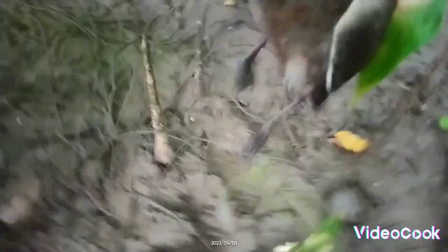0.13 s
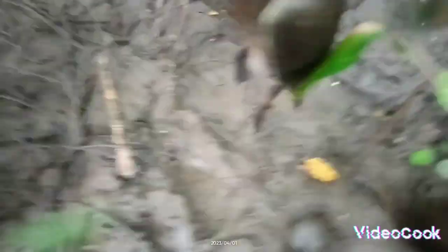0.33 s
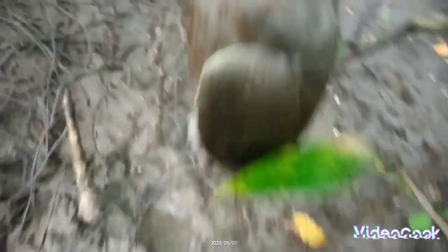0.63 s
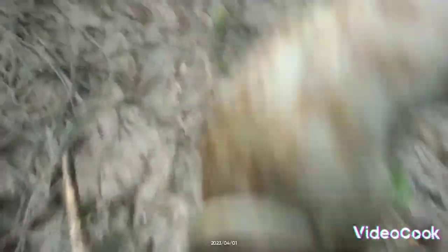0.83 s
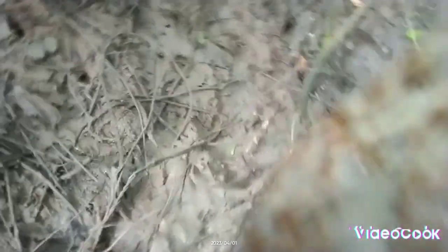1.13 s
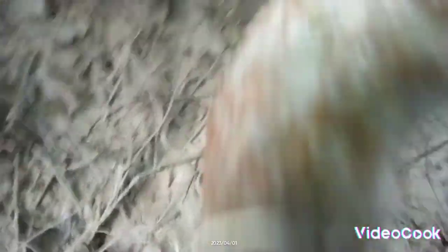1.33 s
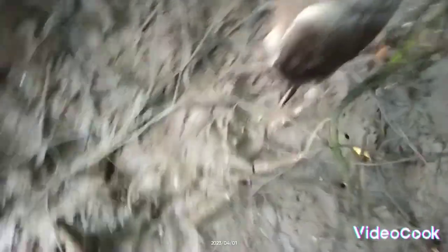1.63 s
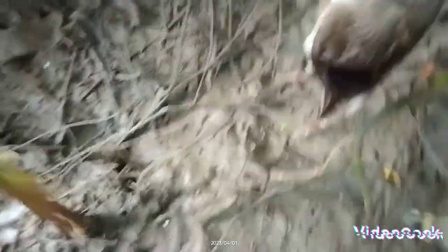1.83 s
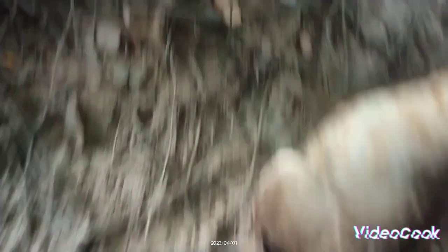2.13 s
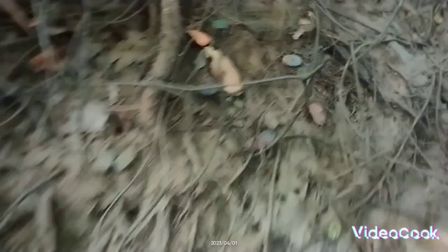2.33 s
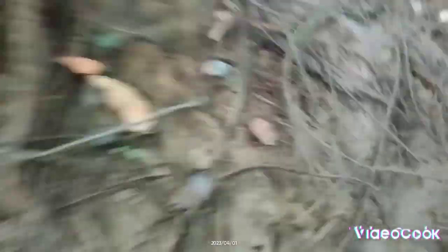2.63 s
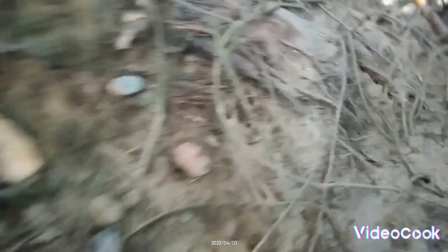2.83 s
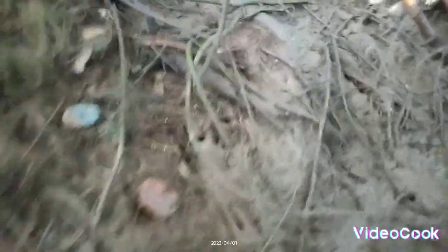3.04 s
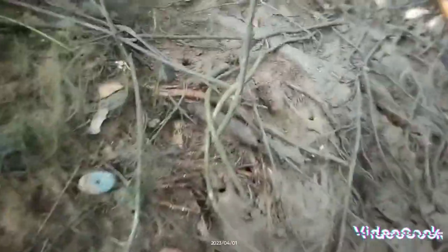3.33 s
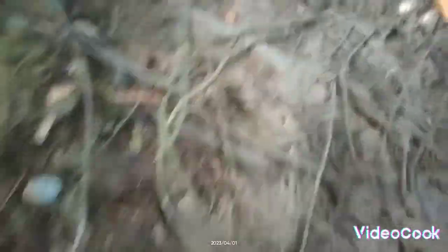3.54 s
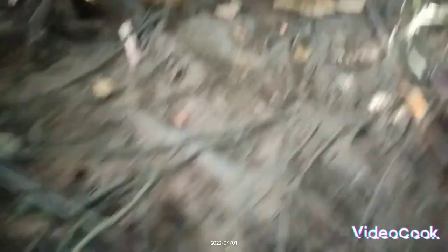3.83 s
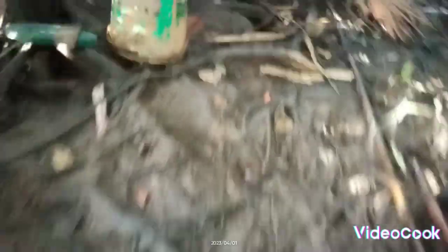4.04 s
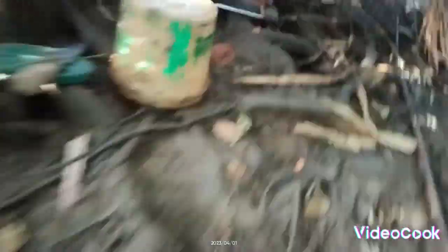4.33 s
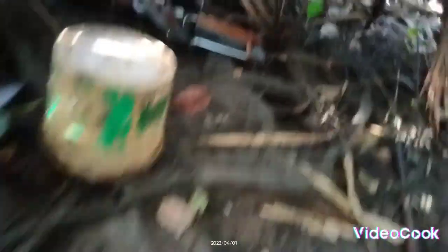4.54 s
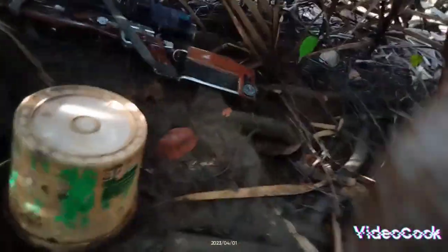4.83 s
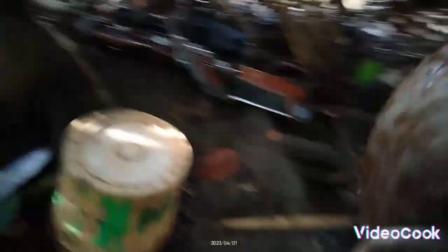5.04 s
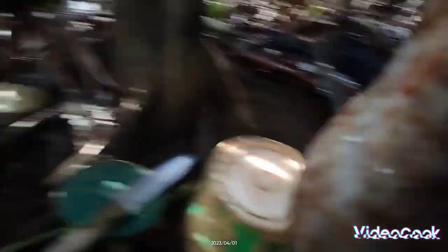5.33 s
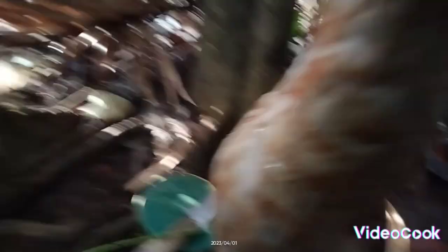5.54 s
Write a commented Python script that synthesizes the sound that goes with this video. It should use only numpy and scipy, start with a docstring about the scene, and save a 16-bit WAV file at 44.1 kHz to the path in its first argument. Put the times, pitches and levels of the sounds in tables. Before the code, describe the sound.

A person walks through dry leaves, twigs and roots in woodland, heard very close and dry in mono, with only faint scatter from ground and trunks. Leaf rustle runs throughout, full of tiny ticks and swelling with each leg movement. A loud woody snap comes at about 0.2 seconds, then a heavier step at 0.6 to 0.8 with low thuds, cracking twigs and brief scrapes. Rustling swells around 1.4, and another weighty step lands at 1.7 to 1.8 with dull soil knocks. At about 2.36 a bright, crisp crunch bursts out. From 2.5 to 4 the movement is lighter: scattered snaps, small crackles and a short brush near 3.6. A strong cluster of snaps and crunching breaks at 4.3, with a thud. Afterwards it thins quickly, with a small crackly step around 5.0 and faint ticks, sinking by 5.6 into a barely audible forest hush.

```python
"""A littered forest floor: someone walks over it, close to a hand-held microphone, then slows to a stop.
Dry leaves rustle all along: showers of tiny clicks and noise, louder with each sweep of a foot or leg.
Feet thud on the soil (fading low tones and noise), scrape over stems (slips ringing one narrow pitch),
crush the litter (dense volleys of clicks) and snap twigs (a ringing tone with a crack of noise).
Over a faint steady hush, the steps scatter softly off the ground and trunks. The sound is mono."""
import sys
import numpy as np
from scipy import signal
from scipy.io import wavfile
from scipy.ndimage import uniform_filter1d

SR = 44100
rng = np.random.default_rng(int(sys.argv[2]) if len(sys.argv) > 2 else 0)


def store_pcm(level_fs):
    """Save levels as 16-bit WAV."""
    pcm = np.round(np.clip(level_fs, -1, 1) * 32767).astype(np.int16)
    wavfile.write(sys.argv[1], SR, np.atleast_2d(pcm).T)


N = 251392  # length of the scene in samples

# Levels in these tables are relative: each layer is trimmed again where it is mixed.
# colour of the forest's hush: pitch_hz, level_db (per Hz)
AIR_COLOUR = [(20, -7.5), (60, 5), (130, 10), (220, 10), (500, -21), (2000, -26), (8000, -29.5),
              (16000, -30)]
# how much the litter stirs between strides, dying away as the walk stops:
# time_s, leaf_rustle_db, low_brushing_db, crisp_top_db
STIR_LEVELS = [(0.0, -38.5, -50, -46), (0.79, -41, -50.5, -44.5), (1.13, -42, -55.5, -48),
               (1.41, -35.5, -56, -39), (1.79, -41, -45.5, -57), (1.98, -38, -49.5, -50.5),
               (2.19, -45.5, -54.5, -53), (2.62, -44.5, -52, -47), (2.87, -45, -57.5, -51),
               (3.35, -43, -54, -49.5), (3.67, -43, -59.5, -46.5), (3.98, -47.5, -56.5, -57),
               (4.19, -51, -56.5, -58.5), (4.44, -46.5, -58.5, -48), (4.78, -60.5, -70, -69),
               (5.19, -56, -61.5, -53), (5.52, -68, -79.5, -73.5), (5.7, -71.5, -78.5, -69.5)]
# a foot or leg sweeps through the litter:
# peak_s, length_s, leaf_rustle_db, low_brushing_db, crisp_top_db
LEG_SWEEPS = [(0.103, 0.11, -43, -58, -45), (0.207, 0.084, -48, -37, -46), (0.344, 0.22, -40, -44, -42.5),
              (0.543, 0.062, -42, -36.5, -59), (0.639, 0.13, -30.5, -36.5, -40),
              (0.788, 0.15, -33.5, -42.5, -46.5), (0.97, 0.35, -45, -44, -64),
              (1.109, 0.076, -36, -40.5, -49), (1.375, 0.35, -38, -44, -56), (1.607, 0.11, -42, -44, -61),
              (1.775, 0.19, -34.5, -43, -38), (1.914, 0.13, -43, -43, -44), (2.076, 0.17, -41.5, -57, -42),
              (2.201, 0.07, -41.5, -49.5, -46), (2.364, 0.088, -40.5, -45, -47),
              (2.634, 0.42, -42, -69, -67), (3.078, .07, -42, -66, -45), (3.258, 0.1, -43.5, -70, -51),
              (3.574, 0.091, -38, -50, -40.5), (3.79, 0.21, -51, -74, -44.5), (4.217, .07, -41.5, -53, -63),
              (4.298, 0.14, -39, -44.5, -43.5), (4.56, 0.3, -50.5, -61, -49),
              (4.74, 0.069, -53.5, -70, -59), (5.006, 0.17, -44, -55, -48), (5.317, 0.048, -63, -72, -49.5),
              (5.437, 0.078, -53.5, -61.5, -54.5), (5.61, 0.061, -59, -66.5, -58.5)]
# colour of the sliding leaves: pitch_hz, level_db (per Hz)
LEAF_COLOUR = [(35, -41), (60, -8.5), (124, -8), (287, -11.5), (338, -6.5), (380, -9.5), (427, -8.5),
               (651, -9), (2140, 6.5), (2970, -0.5), (6900, -11), (7940, -9.5), (10800, -21), (13600, -17),
               (16000, -26.5)]
# weight landing on the soil: start_s, level_db, pitch_hz
SOIL_THUDS = [(0.117, -34, 487), (0.132, -29.5, 383), (0.2092, -32, 307), (0.538, -28, 900),
              (0.6, -21.5, 318), (0.631, -37, 140), (0.669, -30, 620), (0.698, -23.5, 660),
              (0.704, -26.5, 640), (0.708, -27.5, 163), (0.786, -30, 230), (0.793, -33.5, 149),
              (1.102, -33, 373), (1.383, -36, 342), (1.439, -30, 560), (1.618, -35.5, 135),
              (1.726, -26.5, 420), (1.737, -21.5, 356), (1.751, -26.5, 213), (1.799, -19, 470),
              (1.803, -25, 134), (1.82, -25.5, 242), (2.338, -33.5, 770), (4.318, -25, 486),
              (4.999, -35, 470)]
# a sole dragging over roots and stems: start_s, length_s, level_db, pitch_hz, width_hz
SOLE_SCRAPES = [(0.536, 0.024, -34.5, 1210, 600), (0.782, 0.03, -29, 3440, 347),
                (0.793, 0.02, -28.5, 2040, 400), (0.799, .017, -35, 935, 150),
                (0.802, 0.08, -43.5, 3650, 300), (0.928, .039, -39.5, 1620, 500),
                (1.33, 0.052, -40, 7960, 500), (3.568, 0.076, -43, 1290, 400),
                (4.182, 0.03, -46.5, 820, 450), (5.23, 0.1, -49.5, 5940, 800)]
# a clump of leaves crushed at once: start_s, level_db, decay_s, centre_hz
LEAF_CRUNCHES = [(0.334, -27.5, 0.014, 3040), (0.599, -29, 0.0058, 1300), (0.622, -29, 0.0037, 3500),
                 (0.698, -30, 0.01, 1390), (0.9098, -29, 0.0094, 1400), (1.759, -34, 0.0057, 4000),
                 (1.798, -26.5, 0.0037, 3000), (2.3566, -18, 0.0071, 4000), (2.3581, -15.5, 0.005, 6500),
                 (2.365, -29.5, 0.032, 6000), (2.383, -24.5, 0.0046, 4000), (2.881, -35, 0.0066, 2800),
                 (3.082, -33, 0.016, 2370), (4.106, -40, .0022, 14000), (4.2789, -23.5, .005, 9000),
                 (4.294, -38, 0.012, 2000), (4.318, -28.5, 0.0029, 1700), (4.369, -31.5, 0.0014, 7000),
                 (4.4086, -31.5, 0.0018, 4500), (4.459, -33, 0.0078, 3440), (4.9923, -27, 0.0034, 6500),
                 (5.188, -45.5, 0.012, 2500)]
# resonances of dry husks and hollow stalks: pitch_hz, width_hz, level_db
HUSK_RESONANCES = [(1830, 260, 13), (2130, 160, 9.5), (3270, 200, 8), (4200, 300, -3), (5050, 510, 6.5),
                   (7400, 410, 6.5), (8500, 150, 0.5), (10760, 300, -3), (12400, 170, 7.5)]
# twigs and stalks breaking: start_s, ring_db, ring_hz, crack_db
TWIG_SNAPS = [(0.098, -21, 5680, -26), (0.1585, -26, 1900, -21), (0.187, -3.5, 1905, -6.5),
              (0.2061, -16, 2000, -11), (0.2115, -16, 4600, -12.5), (0.3382, -17.5, 2070, -29),
              (0.3468, -27, 1880, -19), (0.636, -14.5, 5040, -30), (0.6461, -6, 1830, -19),
              (0.6481, -8, 1196, -24), (0.658, -18, 1890, -23), (0.6993, -18, 1240, -28),
              (0.7085, -12, 1750, -40), (0.7453, -20, 4700, -25), (0.8323, -21, 4600, -20),
              (1.1489, -29, 4840, -24), (1.3232, -25, 4020, -22), (1.4202, -20.5, 2020, -34),
              (1.4473, -13.5, 4170, -23), (1.4778, -16.5, 4130, -27), (1.6224, -19.5, 1330, -24),
              (1.7986, -13.5, 3170, -26), (2.0118, -26, 1700, -28), (2.1094, -22.5, 3400, -38),
              (2.184, -25, 1970, -37), (2.3575, -11, 1960, -25), (2.3712, -14, 2170, -23),
              (2.399, -20, 2160, -29), (2.5468, -18.5, 7340, -24.5), (2.5539, -32, 3220, -17),
              (2.7228, -21, 2010, -31), (3.0822, -20, 2230, -25), (3.2928, -24.5, 2610, -27),
              (3.3447, -30, 3250, -24.5), (3.4246, -38, 2020, -23.5), (3.469, -27, 1900, -25),
              (3.5361, -17.5, 3570, -24), (3.6511, -11, 8100, -24), (3.7449, -19, 5810, -18),
              (3.7978, -28, 1900, -30), (3.984, -40, 3340, -27.5), (4.2678, -32, 3600, -13.5),
              (4.2751, -6.5, 2000, -22), (4.2846, -2, 1470, -13.5), (4.291, -32, 2850, -14.5),
              (4.3032, -20, 10510, -21), (4.4107, -22, 7260, -20.5), (4.456, -22.5, 1260, -26.5),
              (4.67, -31.5, 3800, -38), (4.943, -22.5, 2140, -24.5), (4.9957, -21, 960, -24.5),
              (5.019, -22, 2870, -38), (5.0422, -15, 5700, -19), (5.3252, -39, 2330, -37),
              (5.4248, -39, 2800, -41), (5.6277, -39, 5500, -38.5)]
# colour of breaking wood: pitch_hz, level_db (per Hz)
CRACK_COLOUR = [(100, -28.5), (500, -19.5), (1300, 2.5), (3500, 3.5), (5000, -5), (7500, -3.5),
                (10000, -17), (13500, -14), (16000, -20)]

STIR_TRIMS_DB = [-1, 1.5, -1]  # for leaf rustle, low brushing and crisp top
SWELL_SHARE, SWEEP_EDGE_DB = 0.45, -13  # part of a sweep spent swelling; its level at either end
THUD_CYCLES = 2.54  # basic decay of soil, in cycles of its pitch
CRUNCH_OCTAVES = 1.22  # sets how widely a crunch's colour spreads
RING_S, RING_FALL = 0.0016, 0.59  # decay of a stick ringing at 2 kHz; power by which higher ones die sooner
# small twigs giving way at random; their levels are relative to the rustle around them
TWIGS_PER_S, TWIG_LOW_HZ, TWIG_HIGH_HZ = 11, 1856, 8040
TWIG_RING_DB, TWIG_CRACK_DB, TWIG_SCATTER_DB = 11.5, 7, 1
EDGE_HZ = 16000  # top of the recorded band


def amp(db):
    """Turns decibels into a plain multiplier."""
    return 10 ** (np.asarray(db) / 20)


def evened(x):
    """Scales x to an average (RMS) level of one."""
    return x / np.sqrt(np.mean(x ** 2) + 1e-20)


def add(mix, start_s, sound):
    """Adds a sound into the mix at its start time, cutting off what runs past the end."""
    part = mix[max(round(start_s * SR), 0):][:len(sound)]
    part += sound[:len(part)]


def colour(x, points, size=2048):
    """Filters x to a (Hz, dB) outline without sounding ahead of time (a minimum-phase filter)."""
    hz, db = np.transpose(points)
    bin_hz = abs(np.fft.fftfreq(size, 1 / SR)) + 1
    log_gain = np.log(amp(np.interp(np.log(bin_hz), np.log(hz), db)))
    response = np.exp(signal.hilbert(log_gain).conj())
    taps = np.fft.ifft(response).real[:size // 2]
    return signal.fftconvolve(x, taps)[:len(x)]


def band(x, low_hz, high_hz, order=2):
    """Keeps the pitches between two edges."""
    edges = np.clip([low_hz, high_hz], [10, 20], [SR * 0.45, SR * 0.49])
    return signal.sosfilt(signal.butter(order, edges, "bandpass", fs=SR, output="sos"), x)


def clicks(length, per_s, spread):
    """Tiny fractures at random moments; sizes follow a power law: many small, a few large."""
    chance, size, sign = rng.random((length, 3)).T
    happens = chance < per_s / SR
    smallness = size + 0.02
    return happens * np.sign(sign - 0.5) * smallness ** -spread


def burst(x, decay_s, rise_s):
    """Gives x a quick swell and an exponential fade, with the energy of a unit level fading so."""
    t = np.arange(len(x)) / SR
    x = x * (1 - np.exp(-t / rise_s)) * np.exp(-t / decay_s)
    return x * np.sqrt(decay_s * SR / 2 / (np.sum(x ** 2) + 1e-20))


def air(level_db=-70):
    """The faint steady hush of the forest: coloured noise."""
    return amp(level_db) * evened(colour(rng.standard_normal(N), AIR_COLOUR))


def woods(x, t60_s=0.14, size=12000):
    """Faint scatter from the ground and nearby trunks: x smeared by a fading tail of noise."""
    t = np.arange(size) / SR
    fade = amp(-60 * t / t60_s) * (1 - np.exp(-t / 0.006))
    tail = band(rng.standard_normal(size), 200, 8000, order=1) * fade
    return signal.fftconvolve(x, tail / np.linalg.norm(tail))[:N]


def movement():
    """Levels in dB of leaf rustle, low brushing and crisp top: the stir plus a swell for each sweep."""
    t = np.arange(0, N, 64) / SR
    when_s, *stir_db = np.transpose(STIR_LEVELS)
    stir_now_db = np.array([np.interp(t, when_s, db) for db in stir_db])
    power = amp(stir_now_db + np.c_[STIR_TRIMS_DB]) ** 2
    for peak_s, length_s, *levels_db in LEG_SWEEPS:
        reach_s = length_s * np.where(t < peak_s, SWELL_SHARE, 1 - SWELL_SHARE)
        shape_db = SWEEP_EDGE_DB * ((t - peak_s) / reach_s) ** 2
        power += amp(np.c_[levels_db] + shape_db) ** 2
    return [np.interp(np.arange(N) / SR, t, db) for db in 10 * np.log10(power)]


def leaf_grains(per_s_at_2khz=150, spread=0.31, cycles=1.98, count=30):
    """Leaves of many sizes, each ticking at its own pitch; together they cover all pitches evenly."""
    t = np.arange(1000) / SR
    out = np.zeros(N)
    for hz in np.geomspace(180, 15500, count):
        tick = np.sin(2 * np.pi * hz * t) * np.exp(-t * hz / cycles)
        ticks = clicks(N, per_s_at_2khz * np.sqrt(hz / 2000), spread)  # small leaves are more numerous
        out += np.sqrt(hz) * evened(signal.oaconvolve(ticks, tick)[:N])
    return evened(out)


def drift(x, depth_db, count=9, size=9):
    """Each leaf or stem that slides past lends its own passing colour: random gain over time and pitch."""
    spectrum = signal.stft(x, nperseg=1024, noverlap=768)[2]
    field = rng.standard_normal(spectrum.shape[::-1]).T
    field = uniform_filter1d(field, count, axis=1)  # smooth over time
    field = evened(uniform_filter1d(field, size, axis=0))  # smooth over pitch
    return signal.istft(spectrum * amp(depth_db * field), nperseg=1024, noverlap=768)[1][:N]


def rustle(leaf, low, crisp, clump_db=1.61, crackle_db=-11, hiss_db=-0.5):
    """Ticking leaves, sharp crackle and smooth sliding, in clumps as the litter gives way."""
    crackle_tick = burst(rng.standard_normal(400), 0.0007, 0.0001)
    crackle = evened(signal.oaconvolve(clicks(N, per_s=42, spread=0.27), crackle_tick)[:N])
    sliding = rng.standard_normal(N)
    litter = leaf_grains() + amp(crackle_db) * crackle + amp(hiss_db) * sliding
    clumps = evened(band(rng.standard_normal(N), 9, 31))  # quick random ups and downs of level
    x = drift(colour(litter * amp(clump_db * clumps), LEAF_COLOUR), depth_db=2.0)
    brushing = amp(-1) * low * evened(band(x, 87, 690, order=3))
    leaves = amp(-2.34) * leaf * evened(band(x, 856, 4740, order=4))
    crisp_top = crisp * evened(band(x, 4880, 19000, order=4))
    return brushing + leaves + crisp_top


def flakes(leaf_db, level_db=-15, per_s=40, spread=0.65, count=5):
    """Brittle leaf edges chip off in thin bright ticks that follow the level of the rustle."""
    out = np.zeros(N)
    for hz in np.geomspace(3000, 11500, count):
        chip = burst(band(rng.standard_normal(300), hz * 0.42, hz * 2.4), 0.0017, 0.0001)
        out += signal.oaconvolve(clicks(N, per_s / count, spread), chip)[:N]
    return amp(level_db + leaf_db) * evened(out)


def scrapes(uneven_db=2.5):
    """Quick slips under uneven pressure excite a narrow resonance."""
    out = np.zeros(N)
    for start_s, length_s, db, hz, width_hz in SOLE_SCRAPES:
        slips = clicks(round(length_s * SR), per_s=4000, spread=0.35)
        pressure = evened(uniform_filter1d(rng.standard_normal(len(slips)), size=200))
        pressed = np.pad(slips * amp(uneven_db * pressure), (0, 200))  # room to ring on
        ringing = band(pressed, hz - width_hz / 2, hz + width_hz / 2)
        add(out, start_s, amp(db) * evened(ringing * signal.windows.tukey(len(ringing), 0.4)))
    return out


def thuds(grit=0.73, size=5000):
    """Soil gives a dull, heavily damped knock, roughened by crumbling earth."""
    t = np.arange(size) / SR
    out = np.zeros(N)
    for start_s, db, hz in SOIL_THUDS:
        decay_s = THUD_CYCLES / hz
        knock = burst(np.sin(2 * np.pi * hz * t), decay_s * 0.66, 0.00023)
        earth_noise = band(rng.standard_normal(size), hz * 0.63, hz * 2.47)
        earth = burst(earth_noise, decay_s * 0.97, 0.00058)
        add(out, start_s, amp(db) * (knock + grit * earth))
    return out


def crunches(husk_db=-2, size=5000):
    """Dense volleys of fractures that die away, ringing the dry husks they break."""
    out = np.zeros(N)
    hz = np.geomspace(100, 18000, 20)
    for start_s, db, decay_s, centre_hz in LEAF_CRUNCHES:
        octaves = np.log2(hz / centre_hz)
        outline_db = -4.3 * (octaves / CRUNCH_OCTAVES) ** 2 - 2 * octaves  # a hump, tilted towards the bass
        volley = colour(clicks(size, per_s=8300, spread=0.17), np.c_[hz, outline_db])
        husks = np.zeros(size)
        for husk_hz, width_hz, gain_db in HUSK_RESONANCES:
            husks += amp(gain_db) * band(volley, husk_hz - width_hz / 2, husk_hz + width_hz / 2, order=1)
        add(out, start_s, amp(db) * burst(volley + amp(husk_db) * husks, decay_s, decay_s * 0.073))
    return out


def small_twigs(leaf_db):
    """Rows like those of TWIG_SNAPS for little twigs that break by chance, following the rustle's level."""
    wait, pitch, ring, crack = rng.random((200, 4)).T
    start_s = np.cumsum(2 * wait / TWIGS_PER_S)
    around_db = np.interp(start_s, np.arange(N) / SR, leaf_db)
    ring_db = around_db + TWIG_RING_DB + TWIG_SCATTER_DB * (2 * ring - 1)
    ring_hz = TWIG_LOW_HZ * (TWIG_HIGH_HZ / TWIG_LOW_HZ) ** (pitch ** 2)  # low pitches come more often
    crack_db = around_db + TWIG_CRACK_DB + TWIG_SCATTER_DB * (2 * crack - 1)
    rows = np.c_[start_s, ring_db, ring_hz, crack_db]
    return rows[start_s < N / SR].tolist()


def snaps(sticks, swell=0.27, crack_share=0.72, splinter_db=-19, thinness=3, size=2048):
    """A sharp crack, a few cycles of the broken stick choked by the sole, and a trail of splintering fibres."""
    t = np.arange(size) / SR
    out = np.zeros(N)
    crack_hz, outline_db = np.transpose(CRACK_COLOUR)
    for start_s, ring_db, hz, crack_db in sticks:
        decay_s = RING_S * (2000 / hz) ** RING_FALL
        choke = np.exp(-(t / (2.6 * decay_s)) ** 4)
        ring = burst(np.sin(2 * np.pi * hz * t) * choke, decay_s, swell * decay_s) / np.sqrt(2)
        crack = burst(rng.standard_normal(size), decay_s * crack_share, decay_s * 0.16)
        fibres = burst(clicks(size, per_s=5000, spread=0.3), 0.004, 0.001)
        fracture = crack + amp(splinter_db) * fibres
        tilt_db = thinness * np.log2(hz / 2600) * np.log2(crack_hz / 3000)  # thin stalks crack brighter
        grain_db = 2.2 * rng.standard_normal(len(crack_hz))  # no two sticks are alike
        coloured = colour(fracture, np.c_[crack_hz, outline_db + tilt_db + grain_db])
        coloured *= np.linalg.norm(fracture) / np.linalg.norm(coloured)  # colour without changing the energy
        add(out, start_s, amp(ring_db) * ring + amp(crack_db) * coloured)
    return out


def scene():
    """The steps snap, crush, thud and scrape over the running rustle; both channels are the same."""
    leaf_db, low_db, crisp_db = movement()
    steps = amp(-1.5) * snaps([*TWIG_SNAPS, *small_twigs(leaf_db)])
    steps += amp(0.5) * crunches()
    steps += amp(-1.0) * band(thuds(), 85, 3000)
    steps += amp(-3.5) * scrapes()
    litter = rustle(amp(leaf_db), amp(low_db), amp(crisp_db)) + flakes(leaf_db)
    mono = litter + steps + amp(-23.0) * woods(steps) + air()
    return np.array([mono, mono])


def record(dry):
    """The microphone sheds deep bass; then a steep filter removes the pitches above EDGE_HZ."""
    thinned = signal.sosfilt(signal.butter(2, 85, "highpass", fs=SR, output="sos"), dry)
    edge_filter = signal.firwin(511, EDGE_HZ, window=("kaiser", 9), fs=SR)
    return signal.oaconvolve(thinned, edge_filter[None], "same")


dry = scene()
out = record(dry)
store_pcm(out)
```